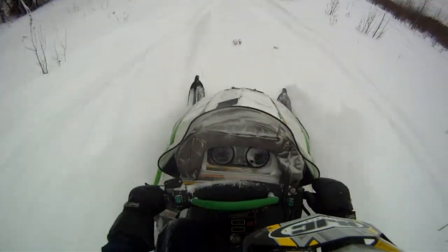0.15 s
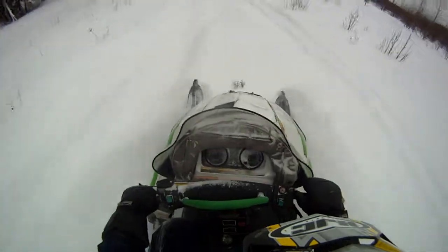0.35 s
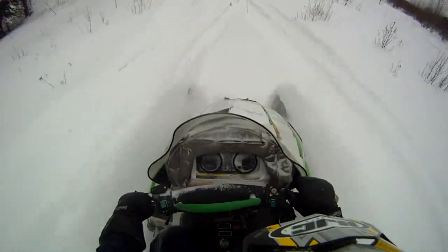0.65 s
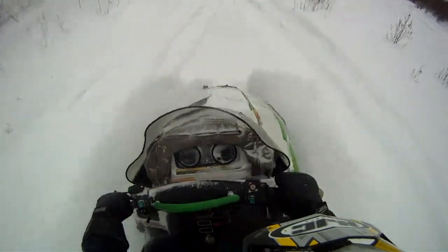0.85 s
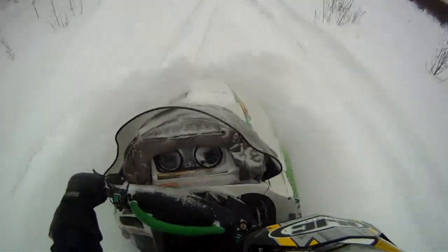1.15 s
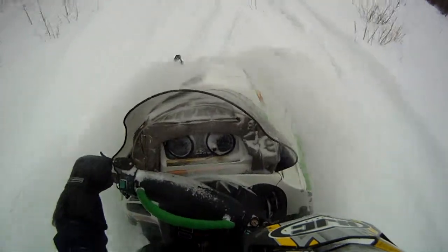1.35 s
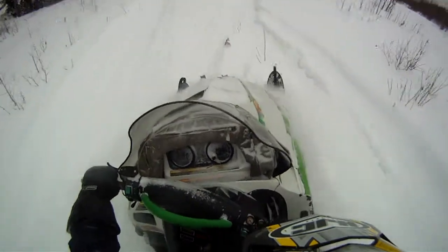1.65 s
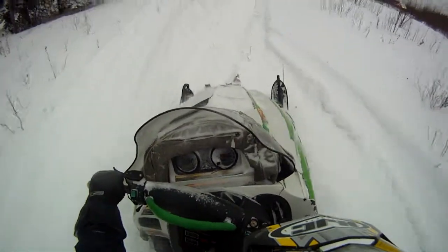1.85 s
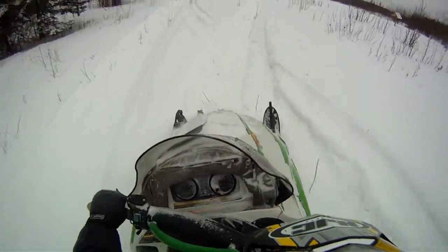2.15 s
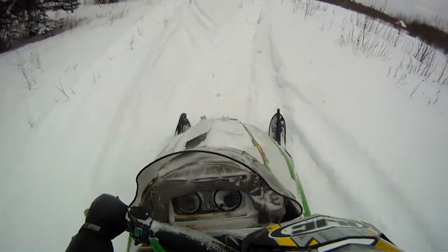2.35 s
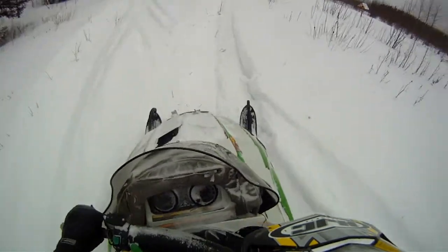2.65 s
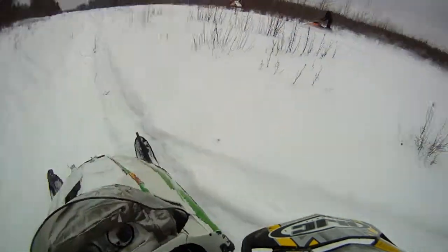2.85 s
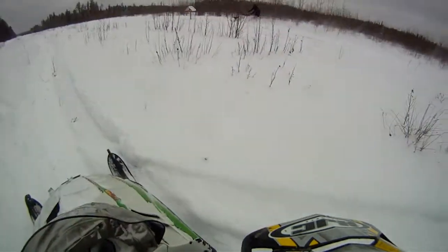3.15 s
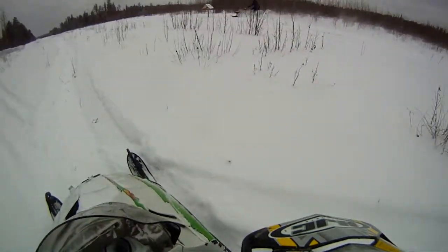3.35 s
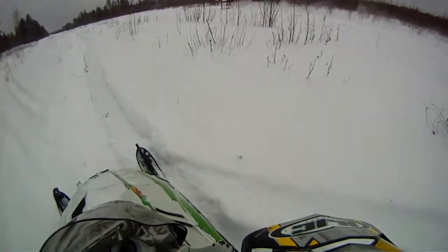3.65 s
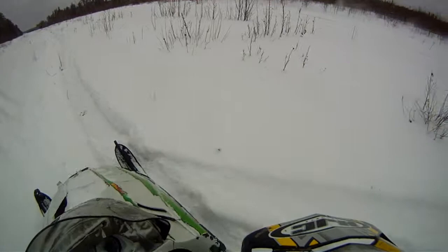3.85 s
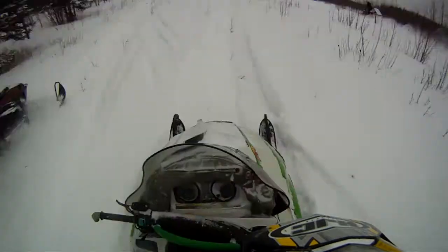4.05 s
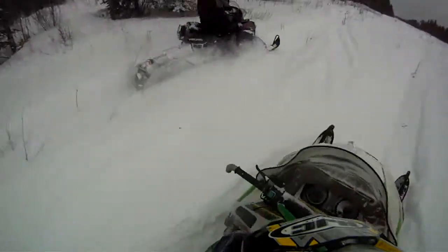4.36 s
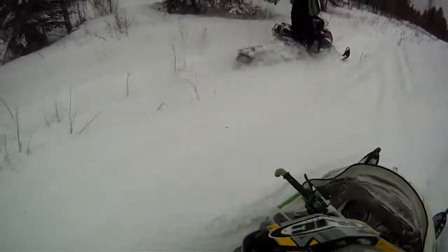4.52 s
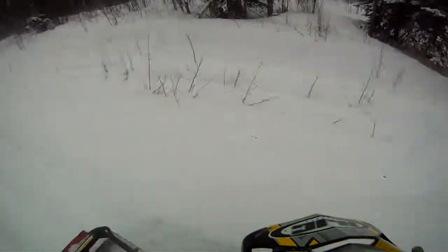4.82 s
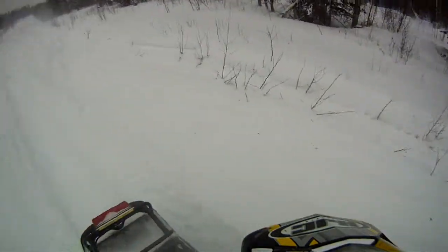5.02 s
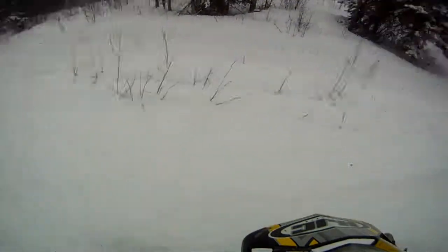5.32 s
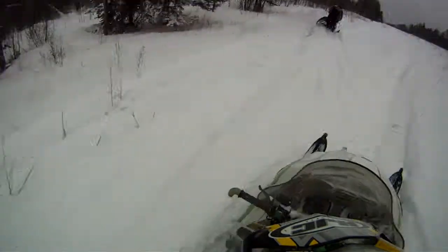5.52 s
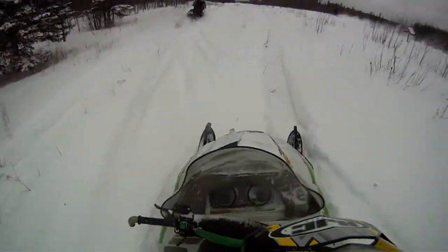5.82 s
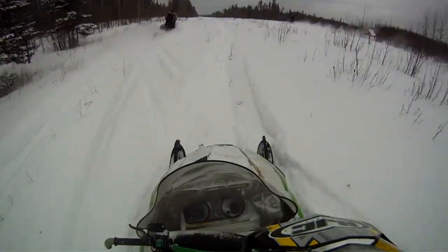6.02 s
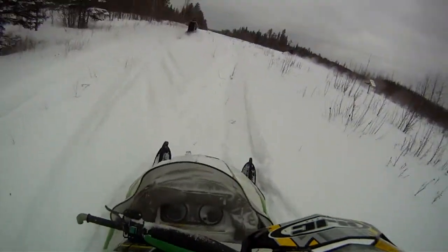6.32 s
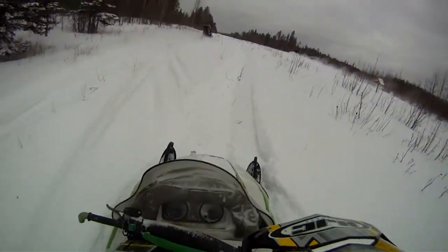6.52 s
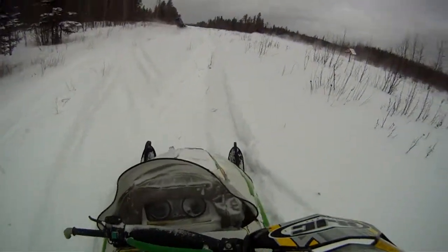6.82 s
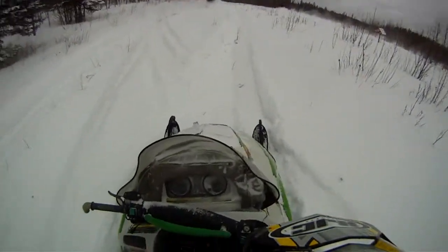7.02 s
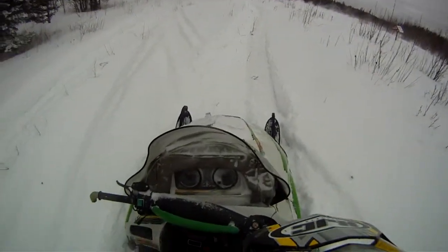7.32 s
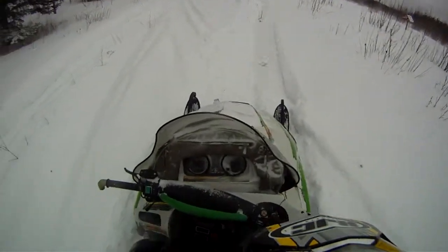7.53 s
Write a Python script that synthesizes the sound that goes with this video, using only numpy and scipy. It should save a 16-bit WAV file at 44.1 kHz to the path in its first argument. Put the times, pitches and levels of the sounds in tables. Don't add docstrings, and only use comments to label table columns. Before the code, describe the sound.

A helmet microphone inside a loose plastic case catches a two-stroke snowmobile on open snow. From 0 s the near engine drones around 125 Hz, with grainy clutch and track clatter ringing boxily at 1.4-3 kHz, over low mount rumble and bumps. At about 1.4 s the throttle blips, rising to about 170 Hz with a raspier intake roar and a wind gust, falling back by 2 s. A second machine then emerges, surging around 3.6-4.2 s, its whine climbing again from 4.9 s and fading by 5.8 s. A brief rattle clicks at 5.3 s. At 6.27 s very loud, blunt knocks hit the helmet within a few hundredths of a second, with case rattles and deep 50 Hz swaying until about 6.6 s. The steady engine continues under low bumps, another sway near 7.5 s and a faint tap at 7.6 s. Harsh, low-quality treble throughout.

```python
import sys
import numpy as np
from scipy import signal
from scipy.fft import rfft, irfft
from scipy.io import wavfile
from scipy.ndimage import uniform_filter1d

SR = 44100
rng = np.random.default_rng(int(sys.argv[2]) if len(sys.argv) > 2 else 0)


def volts_from_decibels(level):
    exponent = np.asarray(level, float) / 20
    return 10 ** exponent


def transcribe(u):
    v = np.clip(np.atleast_2d(u).T, -1, 1)
    q = np.round(v * 32767).astype(np.int16)
    wavfile.write(sys.argv[1], SR, q)


N = 338688

# start_s, peak_db, pitch_hz, t60_s, direction (signed share)
BLOWS = [
    (6.272, -0.5, 125.9, 0.064, -0.58),
    (6.283, 0, 78, 0.033, 0.81),
    (6.297, -1, 125.7, 0.1, 0.21),
    (6.34, -15.5, 124.5, 0.76, 0.38),
    (7.611, -30.5, 119, 0.21, 0.95),
]


def evened(x):
    return x / np.sqrt(np.mean(x ** 2) + 1e-20)


def columns(rows, t):
    s, *values = np.transpose(rows)
    return [np.interp(t, s, v) for v in values]


def add(mix, s, sound):
    part = mix[round(s * SR):][:len(sound)]
    part += sound[:len(part)]


def drift(seconds):
    steps = int(N / SR / seconds) + 2
    aims = rng.standard_normal(steps)
    return np.interp(np.arange(N), np.linspace(0, N, steps), aims) * np.sqrt(1.5)


def swell(t, centre, half):
    return np.exp(-((t - centre) / half) ** 2)


def ring(x, modes):
    hz = np.fft.rfftfreq(len(x), 1 / SR)
    gains = np.array([volts_from_decibels(db) / (1 + 2j * (hz - f) / w) ** 2 for f, w, db in modes])
    phase = gains.sum(0) / abs(gains.sum(0))
    return irfft(rfft(x) * phase * np.linalg.norm(gains, axis=0), len(x))


def tone(turns, db, wobble_db):
    level = volts_from_decibels(db + wobble_db * drift(.06))
    return np.sqrt(2) * level * np.cos(2 * np.pi * (turns + rng.random()))


def near_engine(t):
    # start_s, firing_hz, firing_db (rms), facing_db (muffler side towards the ear)
    cruise = [(0, 131.6, -44, 0), (.31, 123, -46, -15), (.7, 123, -47.5, 6), (1.29, 121.1, -47, 15.5),
              (1.38, 137, -36, -3), (1.48, 152.6, -36.5, 0), (1.6, 165.5, -38, 6), (1.72, 169.1, -40.5, 11),
              (1.77, 167, -39.5, -4), (1.85, 151.1, -52, 5), (2.05, 128.7, -45, 3.5), (2.45, 123.5, -44, 2),
              (3.3, 127, -43.5, -6), (3.78, 123.8, -44.5, 4), (3.9, 126.8, -43.5, -9.5),
              (4.7, 125.8, -41, -6), (6.2, 124.7, -43, -9), (6.9, 122.6, -43, -14), (7.68, 125.7, -42, -11)]
    hz, firing_db, facing_db = columns(cruise, t)
    hz = uniform_filter1d(hz, round(.05 * SR))
    crank = np.cumsum(hz / 2 * (1 + .003 * drift(.03))) / SR
    blip = np.clip((hz - 128) / 35, 0, 1)
    panel = tone(12 * crank, 2 * firing_db + 33, wobble_db=2.5)
    out = near_exhaust(hz, crank, blip, firing_db, facing_db)
    out += ring(np.sqrt(blip) * panel, [(995, 100, 0)])
    return out + clatter(t, crank, blip)


def near_exhaust(hz, crank, blip, firing_db, facing_db):
    # order, level_db (over the firing tone)
    cruise_orders = [(1, -32), (2, -0.5), (3, -17), (4, -12), (5, -17), (6, -21), (7, -40.5), (8, -8),
                     (9, -20.5), (10, -10)]
    # order, level_db (over the firing tone)
    blip_orders = [(1, 2), (2, 1), (3, -10.5), (4, -11), (5, -8), (6, -12), (7, -7.5), (8, -29), (9, -32),
                   (10, -30)]
    # pitch_hz, level_db (over the firing tone)
    pipe = [(258, -9.5), (298, -1), (340, -13.5), (375, -13.5), (440, -8.5), (510, -20.5), (625, -12),
            (720, -34)]
    facing_share = {4: 0.16, 6: 0.83, 10: -0.18}
    out = np.zeros(N)
    for (k, cruise_db), (_, blip_db) in zip(cruise_orders, blip_orders):
        db = firing_db + cruise_db + blip * (blip_db - cruise_db) - 7.6 * (k != 2)
        if k in facing_share:
            pipe_db = columns(pipe, k * hz / 2)[0]
            db = firing_db + pipe_db + facing_share[k] * facing_db + 1.84 * drift(.08)
        out += tone(k * crank, db, wobble_db=0.17)
    return out


def clatter(t, crank, blip):
    # start_s, level_db
    loudness = [(0, -35.5), (.12, -38.5), (1.2, -40), (1.42, -36), (1.62, -33.5), (1.8, -35.5), (2.06, -38),
                (2.3, -38), (2.9, -38.5), (3.2, -37), (3.55, -37), (3.86, -36.5), (4.25, -37.5),
                (5.1, -36.5), (5.37, -36), (5.62, -38.5), (6.2, -40.5), (7.68, -40)]
    # pitch_hz, width_hz, level_db
    case = [(578, 175, -13), (780, 35, -11.5), (986.6, 79, -1.5), (1302, 345, -5), (1442, 35.6, 5.5),
            (1630, 292, 6), (1931, 103.6, 4), (2172, 610, 1), (2673, 144, -6)]
    # pitch_hz, width_hz, level_db
    case_top = [(2968, 390, 20.5), (3450, 310, 14.5), (4465, 1410, 14.5), (5000, 560, -26)]
    ring_db = columns(loudness, t)[0] + 0.23 * drift(.05)
    treble_db = -47.5 + 1.26 * (ring_db + 38) + 0.67 * drift(.07)

    side = np.sign(crank % 1 - .5)
    puff = 1 + 0.2 * np.exp(-(2 * crank % 1) / 0.95) * (1 + 0.19 * side)
    rush = puff * volts_from_decibels(0.12 * drift(0.019)) * rng.standard_normal(N)
    tick_size = volts_from_decibels(3.2 * np.minimum(rng.exponential(1, N), 3))
    ticks = tick_size * (rng.random(N) < 600 / SR) * rng.choice([-1, 1], N)
    drive = evened(rush) + 0.75 * evened(ticks)
    firings = np.diff(np.floor(2 * crank), prepend=0)
    pulses = evened(firings * (1 + .45 * side) * volts_from_decibels(1.5 * rng.standard_normal(N)))

    body = volts_from_decibels(ring_db) * evened(ring(drive + (.55 + .25 * blip) * pulses, case))
    roar = evened(ring(drive, [(2170, 170, -0.43), (2900, 190, 7.0)]))
    body += blip * volts_from_decibels(ring_db - 8.5) * roar
    later = np.roll(drive + 0.22 * pulses, SR // 8)
    treble = volts_from_decibels(treble_db - 2.5) * evened(ring(later, case_top))
    case_note = (1 - blip) * tone(23 * crank, ring_db - 21.0, wobble_db=5.5)
    cowl_db = np.interp(t, [0, .8, 1.2], [-61, -62, -75])
    cowl = volts_from_decibels(cowl_db) * evened(ring(drive, [(787, 120, 0)]))
    return case_note + cowl + head_shadow(body + treble)


def head_shadow(x):
    # start_s, notch_hz, depth_db
    shadow = [(0, 3730, -6.5), (4.1, 3740, -5), (4.35, 3900, 4), (4.68, 5454, 11), (4.85, 5636, 5),
              (5.3, 5400, 2), (5.6, 3730, 4), (6.2, 3540, -2.5), (7.68, 3500, -2)]
    # pitch_hz, width_hz, level_db
    turned = [(2110, 146, -5), (2440, 165, 3.5), (2922, 214, -5.5), (4500, 840, 2)]
    hz, t, z = signal.stft(x, SR, nperseg=1024)
    notch_hz, depth_db = columns(shadow, t)
    patches = uniform_filter1d(rng.standard_normal(z.shape), size=2, axis=0)
    patches = evened(uniform_filter1d(patches, size=8))
    turn = np.clip((notch_hz - 3700) / 600, 0, 1)
    turned_db = sum(db * swell(hz, f, w) for f, w, db in turned)[:, None]
    notch = swell(hz[:, None], notch_hz, 500)
    z = z * volts_from_decibels(1.4 * patches + turn * turned_db - depth_db * notch)
    return signal.istft(z, SR, nperseg=1024)[1][:N]


def wind(t):
    # start_s, level_db
    gusts = [(0, -67.5), (1.2, -74), (1.65, -59.5), (1.9, -69.5), (2.72, -74.5), (3.2, -63), (4.6, -68.5),
             (4.8, -76), (5.35, -76), (5.5, -67.5), (6.3, -68.5), (7.68, -70)]
    hiss = evened(ring(rng.standard_normal(N), [(5850, 1040, 0)]))
    return volts_from_decibels(columns(gusts, t)[0] + 13.5) * hiss


def mount_shaking(t):
    # pitch_hz, level_db (per Hz)
    wash = [(20, 4.5), (45, -6.5), (100, 5), (160, -5), (200, -9), (500, -14), (1100, -21.5), (2000, -54)]
    # start_s, level_db
    shaking_level = [(0, 0.5), (3.6, 1.5), (4.2, -3), (7.68, 0)]
    hz = np.fft.rfftfreq(N, 1 / SR)
    wash_hz, wash_db = np.transpose(wash)
    colour = volts_from_decibels(np.interp(np.log(hz + 1), np.log(wash_hz), wash_db, -40, -80))
    rumble = evened(irfft(rfft(rng.standard_normal(N)) * colour, N))
    return volts_from_decibels(-47 + columns(shaking_level, t)[0]) * rumble


def mount_springs(t):
    # start_s, half_length_s, low_spring_db, high_spring_db
    bumps = [(0, 0.047, -37.5, -48), (0.093, 0.068, -45, -41), (.5, 0.22, -45, -61),
             (0.657, 0.074, -60, -45), (1.68, 0.09, -49, -47), (2.27, 0.037, -37, -53), (3.1, .2, -42, -59),
             (3.42, 0.066, -52, -42), (3.68, .13, -39, -40), (3.9, 0.073, -42, -58),
             (4.181, 0.061, -54, -34), (4.579, 0.071, -48, -38), (5.018, 0.087, -57, -37),
             (5.131, 0.062, -45, -45), (5.4, 0.34, -59, -43), (6.201, 0.056, -44, -44),
             (6.678, 0.07, -31, -39), (6.831, 0.027, -37, -44), (7.037, 0.0502, -32, -44),
             (7.16, 0.052, -38, -43), (7.334, 0.056, -31, -41)]
    out = np.zeros(N)
    for k, (spring_hz, hum_db) in enumerate([(48, -46), (91, -50)]):
        size = volts_from_decibels(hum_db + 3 * drift(.15))
        size += sum(volts_from_decibels(db[k]) * swell(t, s, half) for s, half, *db in bumps)
        turns = np.cumsum(spring_hz * (1 + 0.086 * drift(0.28))) / SR
        out += size * tone(turns, -10.0, wobble_db=3.0)
    return out


def passing_engine(t):
    # start_s, firing_hz, exhaust_db, whine_db (under throttle)
    passing = [(1.9, 155, -57, -50), (2.15, 155.2, -57.5, -39), (2.6, 152.6, -57.5, -41.5),
               (3.1, 155.6, -52, -45), (3.4, 147, -57, -40), (3.6, 150.5, -47, -36.5),
               (3.88, 161.7, -43, -36), (4.03, 175.4, -45.5, -43), (4.12, 186, -50, -34),
               (4.19, 190.4, -51, -46), (4.27, 176, -52.5, -47), (4.7, 171, -64, -44.5),
               (4.93, 174.2, -64, -35), (5.1, 185, -63.5, -35.5), (5.25, 196.9, -76, -40),
               (5.31, 208.7, -64, -37.5), (5.45, 215, -76, -38), (5.8, 218, -79, -70)]
    # order, level_db
    low_orders = [(1, -7), (2, -10.5), (3, -2), (4, -11), (5, -22), (6, -32), (7, -15.5)]
    # order, level_db (over the exhaust)
    bark_orders = [(9, 11.5), (11, 8)]
    # pitch_hz, width_hz, level_db
    bark_ring = [(1464, 130, -2), (1757, 76, 0.5)]
    # order, level_db
    whine_orders = [(8, -5.5), (9, -2), (10, -6)]
    # pitch_hz, width_hz, level_db
    whine_ring = [(1632, 370, 2), (1704, 63, 1)]
    hz, low_db, whine_db = columns(passing, t)
    turns = np.cumsum(hz * (1 + 0.0026 * drift(.02))) / SR
    out = sum(tone(k * turns, low_db + db, wobble_db=1.2) for k, db in low_orders)
    high_whine = tone(16 * turns, whine_db - 20 - (low_db + 58), wobble_db=3)
    out += ring(high_whine, [(2950, 150, 0)])
    out += ring(tone(13 * turns, low_db - 1.5, wobble_db=2), [(2050, 200, 0)])
    bark = sum(tone(k * turns, low_db + db, wobble_db=0.0) for k, db in bark_orders)
    whine = sum(tone(k * turns, whine_db + db, wobble_db=2.5) for k, db in whine_orders)
    return out + ring(bark, bark_ring) + ring(whine, whine_ring)


def case_rattles():
    # start_s, level_db (rms), length_s, pitch_hz, width_hz
    scrapes = [(2.074, -42, 0.0094, 3597, 1501), (3.172, -46, 0.017, 4244, 1200),
               (3.191, -40.5, 0.0055, 4200, 1495), (4.291, -50, 0.0096, 4420, 305.4),
               (5.277, -29.5, 0.013, 1660, 250), (6.272, -24.5, 0.0091, 1620, 404),
               (6.277, -40, .006, 3570, 350), (6.292, -55, 0.006, 3600, 300),
               (6.273, -36.5, 0.007, 3000, 4000), (6.287, -41, 0.015, 1590, 400),
               (6.31, -28, 0.0186, 1785, 220), (6.311, -31.5, 0.0134, 1083, 690),
               (6.277, -33, .01, 1030, 800), (6.309, -42, 0.0133, 3880, 1800),
               (6.332, -47, 0.007, 3600, 300), (6.331, -39, 0.0157, 1580, 1200),
               (6.854, -48, 0.035, 2950, 198.9), (6.908, -47.5, 0.052, 2950, 200),
               (7.2, -39, 0.033, 1612, 98.9), (7.368, -36.5, 0.0084, 1711, 393),
               (7.518, -42.5, 0.013, 969, 122.8), (7.615, -31, .013, 964, 160),
               (7.617, -36, 0.0076, 1920, 100), (7.617, -47, 0.0068, 2900, 1510)]
    out = np.zeros(N)
    for s, db, length, hz, width in scrapes:
        scrape = ring(rng.standard_normal(4096), [(hz, width, 0)])
        scrape = evened(ring(scrape, [(hz, 2 * width, 0)]))
        note = np.sqrt(2) * np.sin(2 * np.pi * hz * np.arange(4096) / SR)
        clean = np.exp(-width / 400)
        sound = (clean * note + (1 - clean) * scrape)[:int(1.15 * length * SR)]
        add(out, s, volts_from_decibels(db) * evened(sound) * signal.windows.tukey(len(sound), .25))
    return out


def helmet_blows(t):
    out = np.zeros(N)
    u = t[:SR // 2]
    for s, db, blow_hz, t60, way in BLOWS:
        onset = 1 - np.exp(-u / 0.0029)
        add(out, s, way * volts_from_decibels(db - 60 * u / t60) * np.sin(2 * np.pi * blow_hz * u) * onset)
    return out


def mount_sway(t):
    # centre_s, half_length_s, pitch_hz, level_db (rms)
    sways = [(6.284, .018, 49, -19.5), (6.347, .022, 51.3, -16.5), (6.391, 0.025, 48, -19),
             (6.46, 0.039, 51.5, -17), (6.57, 0.052, 47, -34), (6.864, 0.017, 50.3, -36),
             (6.95, 0.046, 50, -32.5), (7.416, 0.027, 45.23, -28), (7.498, 0.033, 34, -19.5),
             (7.565, 0.033, 49.2, -25.5), (7.68, 0.066, 48.5, -31)]
    swings = np.array([volts_from_decibels(db) * swell(t, s, half) for s, half, _, db in sways]) + 1e-9
    size = swings.sum(0)
    sway_hz = np.transpose(sways)[2] @ swings / size
    first = round(BLOWS[0][0] * SR)
    phase = 2 * np.pi * np.cumsum(sway_hz[first:]) / SR - 2.28
    out = np.zeros(N)
    out[first:] = np.sqrt(2) * size[first:] * np.sin(phase)
    return out


def scene():
    t = np.arange(N) / SR
    engines = near_engine(t) + passing_engine(t)
    mount = mount_shaking(t) + mount_springs(t) + mount_sway(t) + helmet_blows(t)
    return (engines + wind(t) + mount + case_rattles())[None]


def low_pass(x):
    return signal.sosfilt(signal.butter(12, 15910, fs=SR, output="sos"), x)


def record(dry):
    edge = signal.firwin(121, 5750, window=("kaiser", 3.0), fs=SR)
    limited = signal.oaconvolve(dry, edge[None], "same")
    stored = signal.resample_poly(limited, 40, 147, axis=1, window=("kaiser", 2))
    held = np.repeat(stored, 4, axis=1)
    held = signal.resample_poly(held, 147, 160, axis=1)
    top = signal.firwin(301, 15300, window=("kaiser", 8), fs=SR)
    mix = signal.oaconvolve(held, top[None], "same")[:, :N]
    return low_pass(mix)


dry = scene()
out = record(dry)
transcribe(out)
```